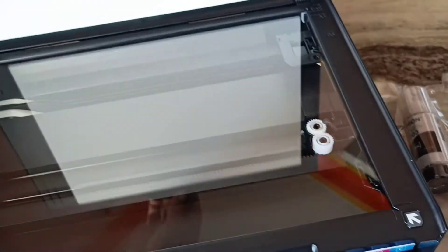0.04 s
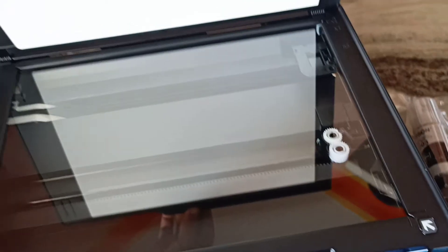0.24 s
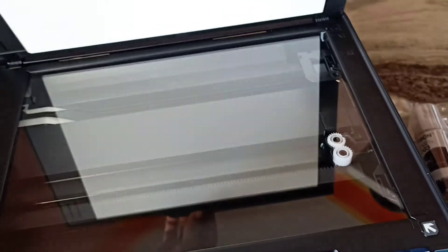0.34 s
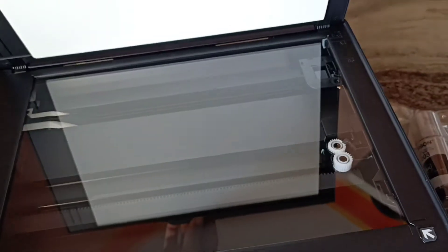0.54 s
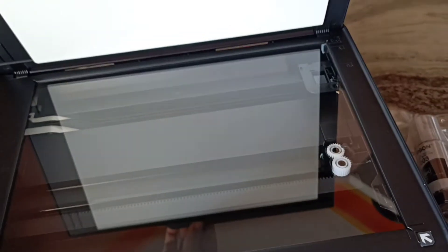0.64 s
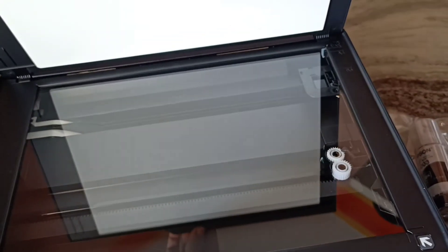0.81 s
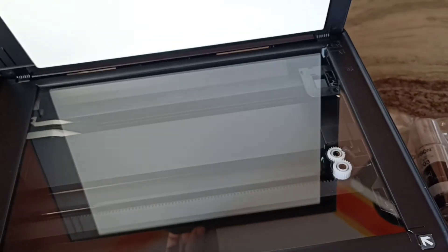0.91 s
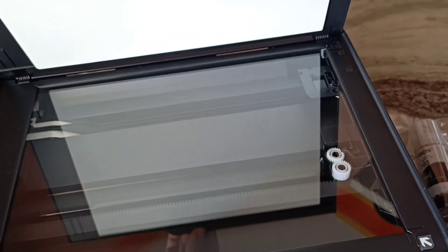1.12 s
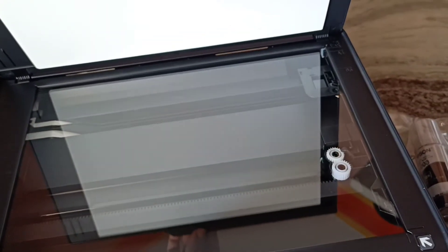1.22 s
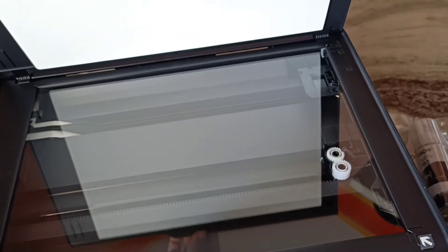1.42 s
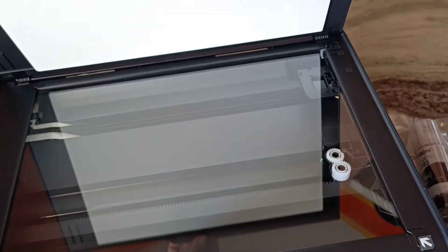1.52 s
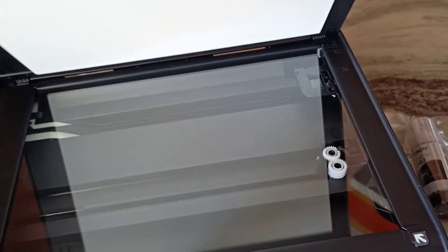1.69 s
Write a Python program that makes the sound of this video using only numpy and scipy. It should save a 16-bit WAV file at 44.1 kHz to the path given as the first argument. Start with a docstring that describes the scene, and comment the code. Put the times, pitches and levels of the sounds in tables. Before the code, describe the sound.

Close to the microphone, a printer clacks and chatters unevenly as its drive slips, thumping the hollow plastic body. A gear whirr builds underneath while the clacks crowd together, over a faint low rush in a small room.

```python
"""A small room, with a phone's microphone close to a desktop printer whose scanner carriage jerks along.
Each slip of the drive snaps and chatters against the plastic shell and thumps the hollow cabinet;
between slips the gears whirr. The room rings briefly over a faint noise floor,
and the phone turns the quiet passages down."""
import sys
import numpy as np
from scipy import signal
from scipy.fft import rfft, irfft
from scipy.io import wavfile
from scipy.ndimage import uniform_filter1d

SR = 44100
rng = np.random.default_rng(int(sys.argv[2]) if len(sys.argv) > 2 else 0)


def persist_wave(psi):
    """Save psi, clipped to +-1, as 16-bit WAV."""
    counts = np.round(np.clip(psi, -1, 1) * 32767).astype(np.int16)
    wavfile.write(sys.argv[1], SR, np.atleast_2d(counts).T)


N = 77175

# spectrum of the noise floor (frequency [Hz], relative level [dB])
FLOOR_COLOUR = [(18, -53), (30, -29.5), (170, 2), (336, 1.5), (721, -20.5), (1350, -16), (1540, -10.5),
                (2610, -25.5), (3310, -18), (8080, -26.5), (16000, -35.5)]
# course of the gear whirr (time [s], level [dB])
WHIRR_LEVELS = [(0,-74),(.08,-67.5),(.17,-56.5),(.33,-50),(.42,-60),(.52,-57),(.64,-65.5),(.72,-47.5),(.9,-47),(1.2,-43),(1.4,-51.5),(1.507,-47.5),(1.544,-71),(1.75,-90)]
# spectrum of the tooth contacts (frequency [Hz], relative level [dB])
GEAR_COLOUR = [(40,-10.5),(100,3),(170,12),(270,10.5),(345,14.5),(470,-4),(850,-10),(1350,-17.5),(2000,-11.5),(3000,-24.5),(5300,-16),(9000,-40),(16000,-35.5)]
# resonances of the plastic panels (frequency [Hz], width [Hz], gain [dB])
PANEL_MODES = [(581,35,-3.5),(725,23,-15.5),(824,56,-1),(934,29,-10),(1067,8.3,-4.5),(1674,110,0.5),(2000,78,-13),(2124,123,3.5),(2662,87,-0.5),(3627,100,1),(5060,200,-1.5)]
# slips of the drive and the relative strength of their parts
# (time [s], click [dB], thump [dB], knock [dB], tick [dB])
SLIPS = [(0.084,-53.5,-63.5,-57,-67), (0.094,-75,-52,-59,-85), (0.1341,-51.5,-49.5,-50,-62),
         (0.1734,-56,-43,-44,-57.5), (0.178,-62,-35,-45.5,-76), (0.203,-52,-44,-56,-58.5),
         (0.224,-38,-27,-41.5,-46.5), (0.2425,-42,-38,-53,-53.5), (0.2526,-36.5,-31.5,-41,-45.5),
         (0.2578,-50,-24.5,-63,-53.5), (0.4611,-39.5,-38,-48,-53), (0.488,-70,-38.5,-54,-59),
         (0.518,-33.5,-25,-41,-46), (0.6604,-40,-38,-52.5,-50), (0.6817,-43,-26.5,-44,-50),
         (0.771,-29,-25.5,-37.5,-37.5), (0.888,-36.5,-44,-43,-48.5), (0.895,-56,-30,-54,-71),
         (0.908,-44,-21,-40.5,-45.5), (0.921,-37.5,-24.5,-45,-50.5), (0.9387,-39,-36.5,-43.5,-46.5),
         (0.982,-32,-65,-58,-50.5), (0.9886,-29,-23,-35,-36), (1.112,-28,-51,-47,-42.5),
         (1.124,-33.5,-34,-40.5,-44.5), (1.172,-34,-41.5,-44.5,-54), (1.1795,-26,-23.5,-37,-35.5),
         (1.2427,-30.5,-34,-44,-49), (1.286,-43,-40,-56,-81), (1.3328,-33.5,-40.5,-50,-48),
         (1.34,-54,-34.5,-50.5,-55), (1.3919,-37,-25.5,-41,-46.5), (1.442,-37,-36.5,-46.5,-55.5),
         (1.452,-37,-47,-45.5,-48), (1.486,-40,-41.5,-52.5,-57)]
# spectrum of a slip's sharp first touch (frequency [Hz], gain [dB])
SNAP_COLOUR = [(2000,-21),(5000,16.5),(7000,6.5),(9500,-7),(12000,-4.5),(16000,-14)]
# spectrum of the plastic shell (frequency [Hz], relative level [dB])
SHELL_COLOUR = [(400,4.5),(1000,1),(1350,-4),(1900,12.5),(3000,2),(4200,-2.5),(5400,0.5),(6700,-7.5),(8000,-16.5),(10000,-24.5),(12500,-14.5),(16000,-23.5)]
# ranges of the shell that a slip excites: knock, click, tick
# (low edge [Hz], high edge [Hz], gain [dB], shortest attack [s], t60 [s])
SHELL_RANGES = [(462,1340,-3.5,0.0027,0.12),(1420,3120,-11.5,0.0015,0.075),(3070,10930,-4,0.00096,0.046)]
# modes of the hollow cabinet (frequency [Hz], relative level [dB], t60 [s])
CABINET_MODES = [(82,-38,0.23),(109.3,-28.5,0.64),(141.5,-21.5,.45),(169,-25,0.31),(181.5,-19,0.27),(215.5,-16.5,0.32),(227,-10.5,.03),(276.4,-21.5,0.23),(306.9,-7,0.26),(307.4,-2.5,0.056),(359.4,-14.5,0.34),(377.8,-20.5,0.39)]
# the room's tail (low edge [Hz], high edge before the cap at SR / 2 [Hz], gain [dB], t60 [s])
ROOM_BANDS = [(89.8,414,-4.5,0.1),(399,1460,-5,0.39),(1470,4500,-15.5,0.54),(3230,8100,-3.5,0.52),(7450,27000,-7,.35)]


def amp(db):
    """Decibels to gain."""
    return 10 ** (np.asarray(db) / 20)


def unit(x):
    """Scale to rms 1."""
    return x / np.sqrt(np.mean(x ** 2))


def fade(t, t60):
    """Exponential decay, 60 dB in t60 seconds."""
    return np.exp(-np.log(1000) * np.maximum(t, 0) / t60)


def band(x, lo_hz, hi_hz, order=3):
    """Band-pass, its upper edge capped just under SR / 2."""
    edges_hz = [lo_hz, min(hi_hz, SR / 2 - 10)]
    return signal.sosfilt(signal.butter(order, edges_hz, "band", fs=SR, output="sos"), x)


def colour(x, points, size=2048):
    """Causal filter through (frequency [Hz], gain [dB]) points."""
    hz, db = np.array(points).T
    curve_db = np.interp(np.log(np.fft.rfftfreq(size, 1 / SR) + 1), np.log(hz), db)
    cepstrum = irfft(np.log(amp(curve_db)))
    cepstrum[1:size // 2] *= 2  # fold to minimum phase
    cepstrum[size // 2 + 1:] = 0
    response = irfft(np.exp(rfft(cepstrum)))
    return signal.fftconvolve(x, response)[:len(x)]


def add(out, start_s, x):
    """Mix x in at a time."""
    i = int(start_s * SR)
    out[i:i + len(x)] += x[:len(out) - i]


def noise_floor(level_db=-62.5):
    """A faint, steady, low rush lies behind the printer."""
    return amp(level_db) * unit(colour(rng.standard_normal(N), FLOOR_COLOUR))


def gears(teeth_per_s=2200, scatter_db=3):
    """Uneven tooth contacts, too dense to count, whirr through the panels."""
    contacts = rng.random(N) < teeth_per_s / SR
    teeth = contacts * rng.standard_normal(N) * amp(scatter_db * rng.standard_normal(N))
    level_db = np.interp(np.arange(N) / SR, *np.array(WHIRR_LEVELS).T)
    return amp(level_db) * unit(panels(colour(teeth, GEAR_COLOUR)))


def panels(x):
    """The plastic panels ring with whatever shakes them."""
    ringing = 0
    for hz, width_hz, db in PANEL_MODES:
        ringing += amp(db) * signal.lfilter(*signal.iirpeak(hz, hz / width_hz, fs=SR), x)
    return x + ringing


def clacks(hard_db=-38.5, snap_growth=1.13, slowing_per_db=0.0933):
    """Every slip of the drive is a snap, a chatter of plastic and a thump of the cabinet."""
    out, t = np.zeros(N), np.arange(SR // 2) / SR
    brief = t[:len(t) // 2]
    for start, click_db, thump_db, knock_db, tick_db in SLIPS:
        add(out, start, amp(thump_db) * thump(t))
        # harder slips snap more strongly; lighter ones build up more slowly
        hardness_db = tick_db - hard_db
        snap_db = hard_db - 3 + snap_growth * hardness_db
        slowing = 1 + slowing_per_db * max(-hardness_db, 0)
        add(out, start, amp(snap_db) * snap(brief))
        for strength_db, (lo, hi, db, attack_s, t60) in zip((knock_db, click_db, tick_db), SHELL_RANGES):
            add(out, start, amp(strength_db + db) * chatter(brief, lo, hi, attack_s * slowing, t60))
    return out


def snap(t):
    """The first touch of hard plastic, heard close: a few milliseconds of bright crack."""
    return colour(rng.standard_normal(len(t)) * fade(t, t60=0.022), SNAP_COLOUR)


def chatter(t, lo_hz, hi_hz, attack_s, t60, unevenness=0.23):
    """A burst of tiny contacts rings one range of the shell."""
    contacts = rng.standard_normal(len(t)) * np.exp(unevenness * rng.standard_normal(len(t)))
    burst = contacts * np.minimum(t / attack_s, 1) * fade(t - attack_s, t60)
    ringing = band(panels(colour(burst, SHELL_COLOUR)), lo_hz, hi_hz)
    return ringing / np.sqrt(np.sum(ringing ** 2) / (0.02 * SR))  # the energy of 20 ms at rms 1


def thump(t, push_s=0.00716, swell_cycles=2.3, scatter_db=1, detune=0.016):
    """A soft push swells the cabinet's modes, the low ones more slowly; they beat as they die."""
    out, since_push = 0, t - push_s
    for hz, db, t60 in CABINET_MODES:
        cycles_to_go = np.maximum(swell_cycles - hz * t, 0)
        swell = np.exp(-cycles_to_go ** 2 / 2) * (1 - fade(t, push_s))
        gain = amp(db + scatter_db * rng.standard_normal())
        pitch_hz = hz * (1 + detune * rng.standard_normal())  # each blow shifts the modes a little
        out += gain * swell * np.cos(2 * np.pi * pitch_hz * since_push) * fade(since_push, t60)
    return out


def room(x, build_s=0.0093):
    """The small room's diffuse reflections reach the microphone, each band with its own decay."""
    t, response = np.arange(SR // 2) / SR, 0
    build_up = np.minimum(t / build_s, 1) ** 2
    for lo, hi, db, t60 in ROOM_BANDS:
        tail = band(rng.standard_normal(len(t)), lo, hi) * fade(t, t60) * build_up
        band_energy = 2 * (hi - lo) / SR
        response += amp(db) * tail * np.sqrt(band_energy / np.sum(tail ** 2))
    return signal.fftconvolve(x, response)[:N]


def scene():
    """At the microphone, in mono: the printer close up, the room and the noise floor behind it."""
    printer = clacks() + gears()
    floor = noise_floor()
    return (printer + room(printer) + floor)[None]


def record(dry, low_cut_hz=28, top_hz=16100, threshold_db=-50, depth_db=9, slope=1.6, window_s=0.047):
    """The phone thins the deep bass, its noise suppressor lowers quiet passages, and the top is cut."""
    x = signal.sosfilt(signal.butter(1, low_cut_hz, "high", fs=SR, output="sos"), dry)
    power = uniform_filter1d(x ** 2, int(window_s * SR), axis=-1)
    level_db = 10 * np.log10(np.abs(power) + 1e-12)
    gain_db = np.clip(slope * (level_db - threshold_db), -depth_db, 0)
    top_cut = signal.ellip(10, 0.2, 70, top_hz, fs=SR, output="sos")
    return signal.sosfilt(top_cut, x * amp(gain_db))


dry = scene()
out = record(dry)
persist_wave(out)
```